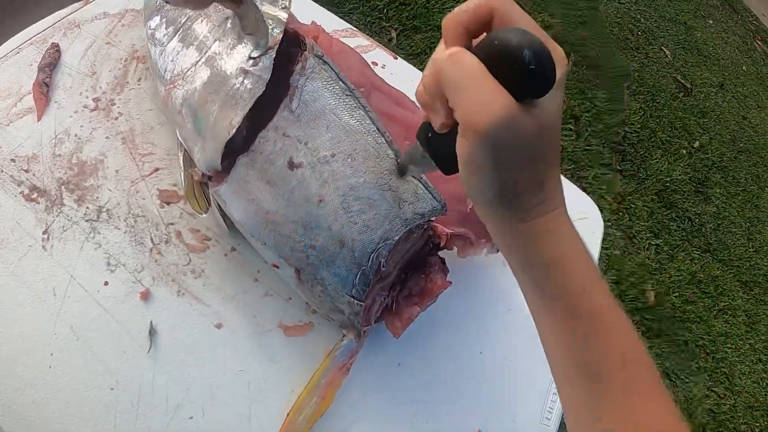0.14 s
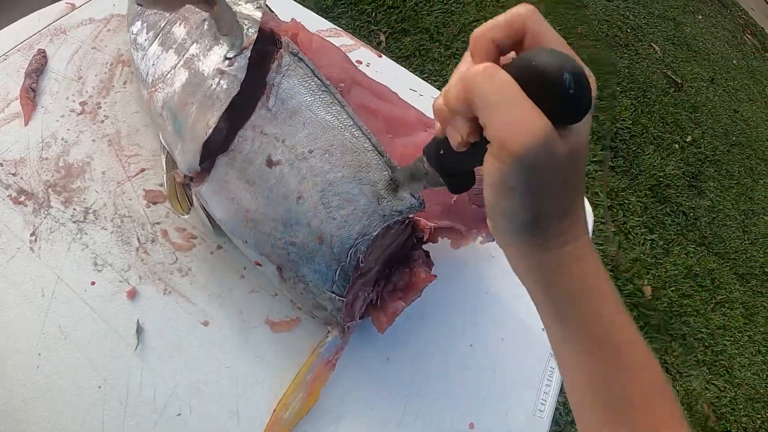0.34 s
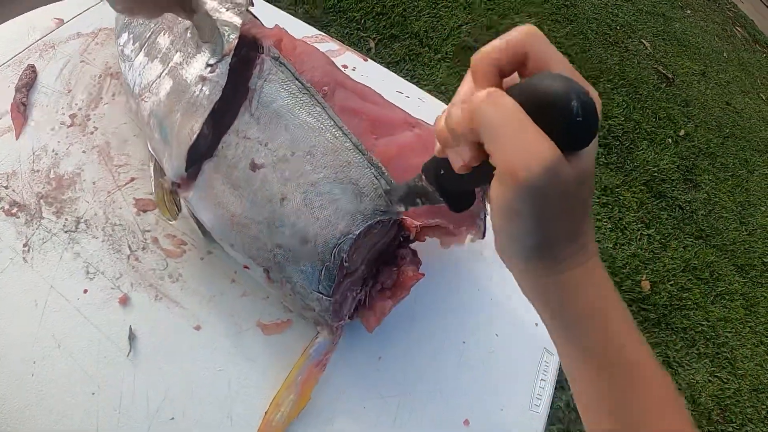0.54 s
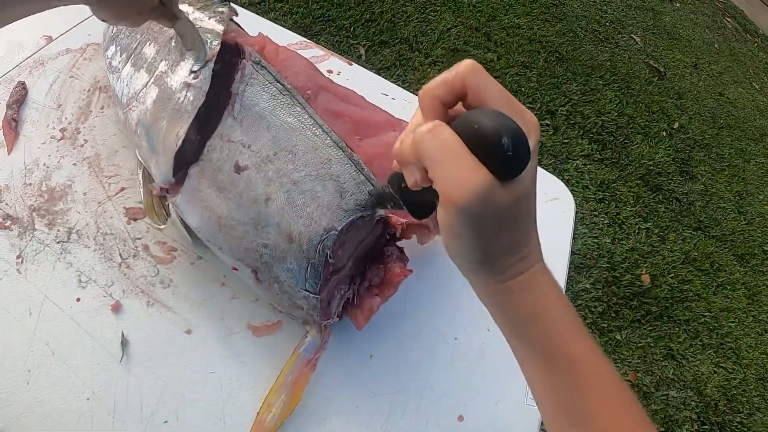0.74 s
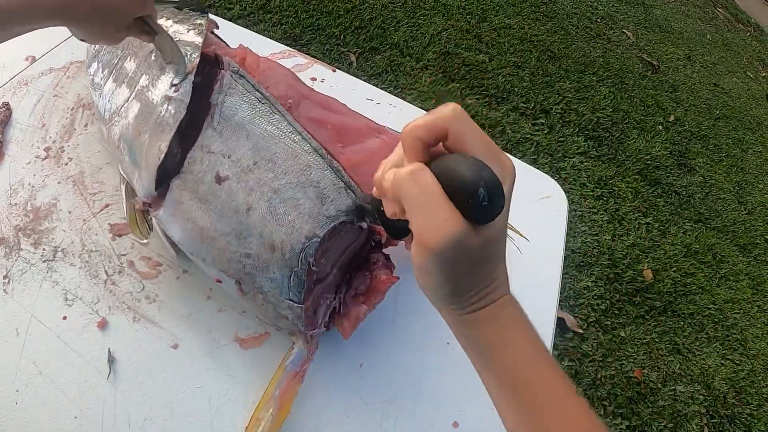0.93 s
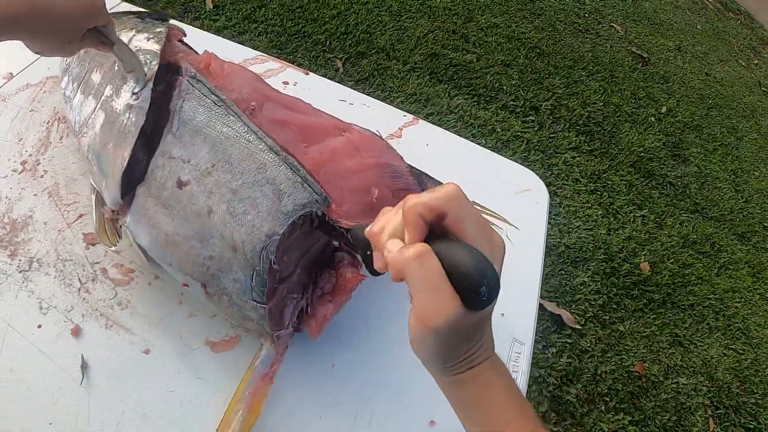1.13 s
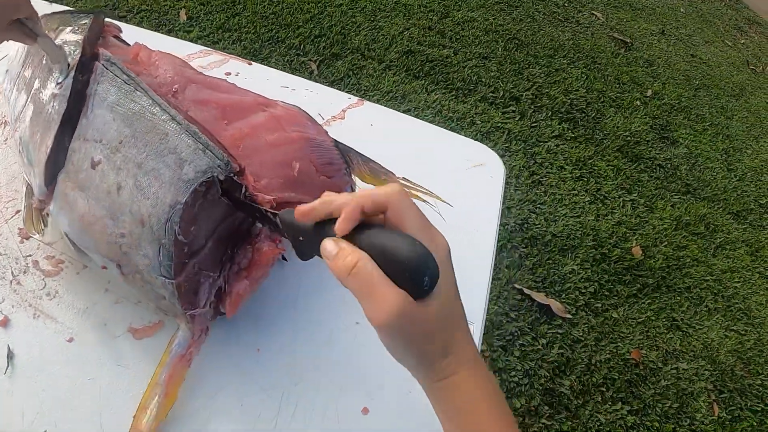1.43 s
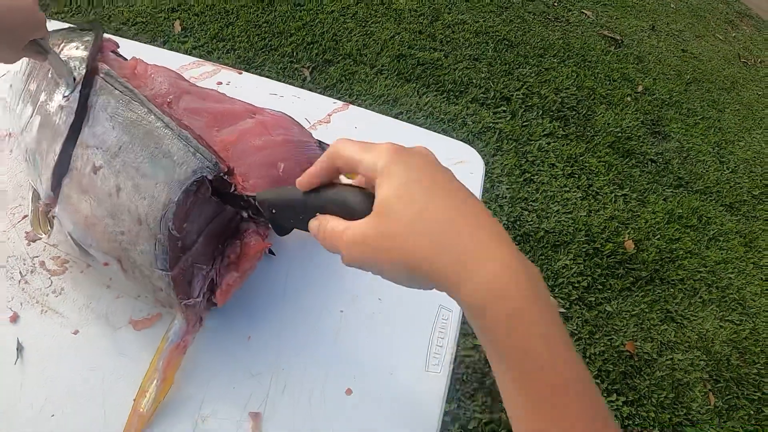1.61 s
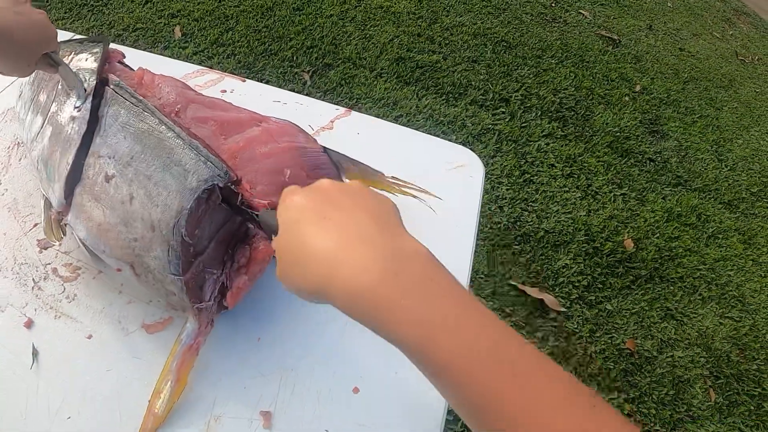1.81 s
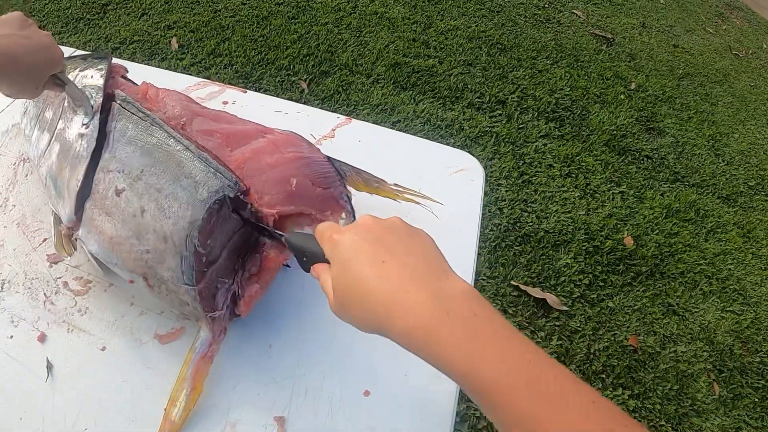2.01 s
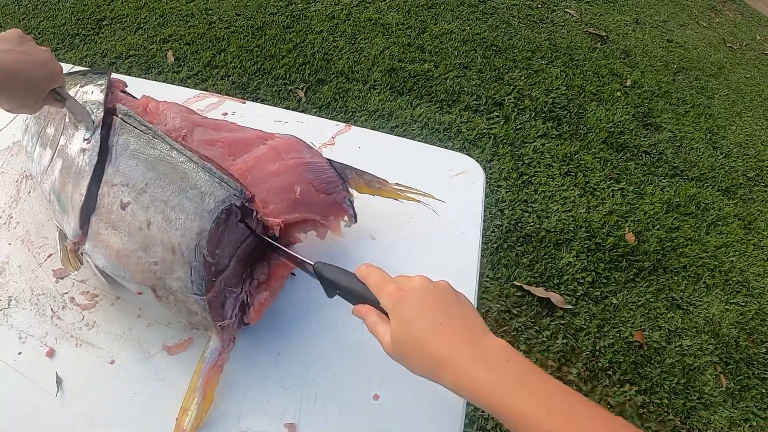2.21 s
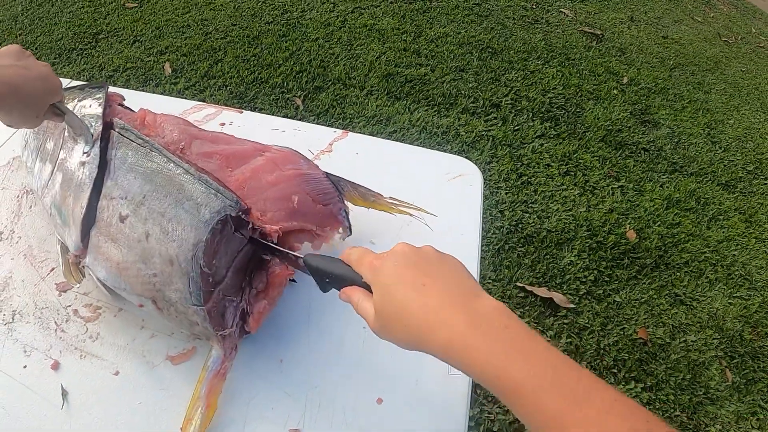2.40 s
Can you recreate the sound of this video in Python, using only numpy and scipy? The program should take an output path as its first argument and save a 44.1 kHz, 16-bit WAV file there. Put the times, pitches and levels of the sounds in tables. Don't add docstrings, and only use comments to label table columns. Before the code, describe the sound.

Fish being cut with a knife: dry rasps, sharp bone snaps and dull table thumps outdoors

```python
import sys
import numpy as np
from scipy import signal
from scipy.fft import rfft, irfft, next_fast_len
from scipy.io import wavfile
from scipy.ndimage import uniform_filter1d, map_coordinates

SR = 44100
rng = np.random.default_rng(int(sys.argv[2]) if len(sys.argv) > 2 else 0)


def int16_out(signal):
    q = np.round(np.clip(np.atleast_2d(signal).T, -1, 1) * 32767)
    wavfile.write(sys.argv[1], SR, q.astype(np.int16))


def makeup_ratio(level_db):
    decades = np.asarray(level_db, float) / 20
    return 10 ** decades


N = 112454


def unit(x):
    return x / np.sqrt(np.mean(x ** 2) + 1e-20)


def along(points, hz):
    point_hz, value = np.transpose(points)
    return np.interp(np.log(hz + 1), np.log(point_hz + 1), value)


def wobble(rate_hz):
    knots = rng.standard_normal(int(N * rate_hz / SR) + 4)
    return map_coordinates(knots, [np.arange(N) * rate_hz / SR])


def filtered(x, response):
    n = x.shape[-1]
    padded = next_fast_len(n + 4096)
    hz = np.fft.rfftfreq(padded, 1 / SR)
    return irfft(rfft(x, padded) * response(hz), padded)[..., :n]


def body(modes):
    def response(f):
        total = 0
        for k, (centre, width, db) in enumerate(modes):
            resonance = 1j * f * width / (centre * centre - f * f + 1j * f * width)
            total = total + (-1) ** k * makeup_ratio(db) * resonance
        return total
    return response


def add(track, start_s, sound):
    part = track[..., round(start_s * SR):][..., :sound.shape[-1]]
    part += sound[..., :part.shape[-1]]


def push(start_s, length_s, db, rise, release_s):
    t = np.arange(N) / SR - start_s
    build_up = np.clip(t / (length_s * np.clip(rise, .02, 1)), 0, 1) ** 1.2
    return makeup_ratio(db) * build_up * np.exp(-np.maximum(t - length_s, 0) / release_s)


def knock(db, hz, t60):
    t = np.arange(SR // 10) / SR
    attack = 1 - np.exp(-t / 0.00098)
    return makeup_ratio(db - 60 * t / t60) * attack * np.sin(2 * np.pi * hz * t)


# frequency_hz, correlation
LIKENESS = [(60, 1), (240, 0.89), (950, 0.47), (3770, 0.83), (15000, 0.06)]


def rush(spectrum, spiky_db):
    pair = rng.standard_normal((2, N)) * makeup_ratio(spiky_db * rng.exponential(size=N))

    def response(hz):
        turn = np.arccos(np.clip(along(LIKENESS, hz), -1, 1)) / 2
        return makeup_ratio(along(spectrum, hz)) * np.array([np.cos(turn), np.sin(turn)])

    mid, side = filtered(pair, response)
    return unit(np.array([mid + side, mid - side]))


# frequency_hz, level_db
RUMBLE_SPECTRUM = [(12, -46.5), (20, -21.5), (81, -2), (123, -2.5), (215, -15.5), (320, -18.5), (393, -28),
                   (900, -37.5), (1170, -31), (1980, -120)]
# frequency_hz, level_db
GARDEN_SPECTRUM = [(180, -32), (300, -16), (600, -20.5), (2500, -25.5), (8000, -35.5), (14000, -53)]
WIND_DB, GARDEN_DB = -52.5, -68.5
RATTLE_DB = -6


def air(booms):
    shake = uniform_filter1d(np.abs(booms), size=900)
    rumble_gain = makeup_ratio(WIND_DB + 1.4 * wobble(18)) + makeup_ratio(RATTLE_DB) * shake
    rumble = rumble_gain * rush(RUMBLE_SPECTRUM, spiky_db=0.0)
    deeper = [(hz / 2.4, db) for hz, db in RUMBLE_SPECTRUM]
    legs = makeup_ratio(RATTLE_DB - 3) * shake * rush(deeper, spiky_db=2)
    garden = makeup_ratio(GARDEN_DB + 0.26 * wobble(28)) * rush(GARDEN_SPECTRUM, spiky_db=-1.5)
    return rumble + legs + garden


# start_s, length_s, pitch_hz, level_db
BIRD_CHIRPS = [
    (0.82, .03, 7000, -69),
    (2.53, .025, 7500, -67.5),
]


def bird():
    t = np.arange(N) / SR
    out = np.zeros(N)
    for start_s, length_s, hz, db in BIRD_CHIRPS:
        since = t - start_s
        tone = np.sin(2 * np.pi * hz * since * (1 - 0.33 * since))
        out += push(start_s, length_s, db, .3, .004) * tone * makeup_ratio(3 * wobble(180))
    return out


# start_s, peak_db, boom_hz, free_ring_s, scuff_db
TABLE_SHOVES = [(0.091, -38.5, 136, 0.17, -13), (0.184, -42, 77.5, 0.072, -27),
                (0.4045, -32.5, 121, 0.028, -4.5), (0.441, -34, 80.6, 0.043, -7.5),
                (0.534, -38.5, 117.3, 0.043, -8), (0.656, -33.5, 124.6, 0.065, -3),
                (0.788, -33.5, 114.3, 0.055, -7), (0.908, -32, 104, 0.027, -1),
                (0.954, -35.5, 135, 0.017, -25), (0.981, -33.5, 99.5, 0.018, -5.5),
                (1.041, -32, 107.4, 0.049, -8), (1.071, -35, 128, 0.057, -8),
                (1.135, -29.5, 80.4, 0.06, -2), (1.313, -44.5, 102, 0.032, -9),
                (1.383, -45.5, 124, 0.04, -3), (1.532, -45, 114, 0.029, -2.5),
                (1.641, -41, 113.5, 0.034, -4), (1.85, -49, 115, 0.079, 2), (1.959, -34.5, 74, 0.027, -28),
                (1.986, -32, 119.3, 0.048, -26), (2.084, -39, 131.3, 0.076, 0.5),
                (2.25, -28, 147.6, 0.024, -9.5), (2.277, -29.5, 80, 0.018, -37),
                (2.356, -38.5, 121.5, 0.057, -4.5), (2.509, -45.5, 116.5, 0.064, -4)]
# start_s, peak_db, pitch_hz, t60_s
TABLE_BUMPS = [
    (.1595, -38, 1050, .012),
    (.79, -46, 480, .03),
    (.91, -30, 250, .035),
    (.9185, -35, 290, .05),
    (.9695, -35, 740, .014),
    (.9735, -36, 520, .05),
]
# frequency_hz, width_hz, level_db
PANEL_MODES = [(161.5, 33, 0), (228.7, 27.5, 2.5), (314, 16.7, -2), (370, 20, -6.5), (531, 43, -6.5),
               (800, 170, -18)]
SAG, SAG_S, SHOVE_ATTACK_S = 0.85, 0.0031, 0.0027
SCUFF_T60, BOOM_T60, DAMP_T60 = 0.095, 0.49, 0.13


def table():
    out, t = np.zeros(N), np.arange(SR // 2) / SR
    for start_s, db, hz, free_s, scuff_db in TABLE_SHOVES:
        turns = hz * (t + SAG * SAG_S * (1 - np.exp(-t / SAG_S)))
        rise = 1 - np.exp(-t / SHOVE_ATTACK_S)
        decay = makeup_ratio(-60 * t / BOOM_T60 - 60 * np.maximum(t - free_s, 0) / DAMP_T60)
        boom = np.sin(2 * np.pi * turns) * rise * decay
        rub = rng.standard_normal(len(t)) * rise * makeup_ratio(-60 * t / SCUFF_T60)
        scuff = filtered(rub, body(PANEL_MODES))
        boom = boom / np.abs(boom).max()
        scuff = makeup_ratio(scuff_db) * scuff / np.abs(scuff).max()
        add(out, start_s, makeup_ratio(db) * (boom + scuff))
    for start_s, db, hz, t60 in TABLE_BUMPS:
        add(out, start_s, knock(db, hz, t60))
    return out


# centre_s, peak_db, pitch_hz, half_length_s
TABLE_JOLT = (.1765, -20.5, 88, .0048)


def jolt():
    centre_s, db, hz, half_s = TABLE_JOLT
    t = np.arange(N) / SR - centre_s
    return -makeup_ratio(db) * np.sin(2 * np.pi * hz * t) * np.exp(-.5 * (t / half_s) ** 2)


# start_s, length_s, level_db, build_up_share
SKIN_STROKES = [(0, 0.048, -52.5, 0), (0.067, 0.067, -57, 0.56), (0.123, 0.037, -46.5, 0.35),
                (0.256, 0.081, -54, 0.25), (0.366, 0.078, -43.5, 1), (0.504, 0.11, -55.5, 0.5),
                (0.638, 0.055, -50, 0.5), (0.917, 0.032, -61.5, 0.5), (0.98, 0.021, -59, 0.85),
                (1.1, 0.028, -61, 0.7), (1.163, 0.026, -71, 0.3), (1.235, 0.18, -68, 0.03),
                (1.504, 0.058, -63, 0.24), (1.892, 0.065, -60.5, 0.08), (2.228, 0.066, -54.5, 0.3)]
# start_s, length_s, level_db, slit_hz
FLESH_SLIDES = [(0, 0.35, -64, 3520), (0.401, 0.17, -50.5, 2590), (0.615, 0.14, -53.5, 2500),
                (0.8, 0.21, -63, 1900), (1.039, 0.14, -58.5, 2580), (1.234, 0.3, -67.5, 2400),
                (1.491, 0.2, -67.5, 2410), (1.922, 0.076, -57.5, 2290), (2.204, .12, -58.5, 2700),
                (2.403, 0.18, -62, 2400)]
# frequency_hz, density_db (per Hz)
SKIN_SPECTRUM = [(710, -11), (1200, -7), (2400, -8), (3880, -3.5), (6000, -10.5), (8800, -6.5),
                 (12400, -18.5), (15400, -17), (16500, -37)]
# frequency_hz, density_db (per Hz)
FLESH_SPECTRUM = [(240, -35.5), (400, -0.5), (753, -2), (1880, -5), (2520, -9), (4240, -8), (5940, -9),
                  (11500, -30.5), (15000, -71.5), (22000, -120)]


def blade():
    strokes = sum(push(*row, release_s=0.01) for row in SKIN_STROKES)
    rasp = strokes * makeup_ratio(2.6 * wobble(150)) * rush(SKIN_SPECTRUM, spiky_db=1) * makeup_ratio([[.8], [-.8]])
    flutter = makeup_ratio(1.2 * wobble(24.96) + 0.86 * wobble(120))
    flesh = rush(FLESH_SPECTRUM, spiky_db=2.5) * flutter * makeup_ratio([[-1.5], [1.5]])
    slides = np.zeros((2, N))
    for start_s, length_s, db, slit_hz in FLESH_SLIDES:
        slit = body([(slit_hz, 300, 9)])
        sung = unit(filtered(flesh, lambda f: 1 + slit(f)))
        slides += push(start_s, length_s, db + 2.0, 0.23, release_s=0.035) * sung
    return rasp + slides


def even(x, burst):
    y = x
    for _ in range(12):
        spectrum = rfft(y)
        y = irfft(spectrum / (np.abs(spectrum) + 1e-9), len(x)) * burst
    return y * np.linalg.norm(x) / np.linalg.norm(y)


STRAIN_S = .008


def crack(db, colour, hold_s, t60, apart, blow):
    t = np.arange(SR // 20) / SR - STRAIN_S
    splinters = makeup_ratio(-60 * np.maximum(t - hold_s, 0) / t60)
    tail = makeup_ratio(-30.5 - 60 * t / 0.06)
    shape = np.where(t < 0, makeup_ratio(-38 + 3100 * t), splinters + tail)
    common, differing = rng.standard_normal((2, len(t))) * shape
    common[round(STRAIN_S * SR)] = blow
    burst = (t >= 0) & (t < hold_s + t60 / 8)
    common = np.where(burst, even(common * burst, burst), common)
    pair = np.array([common + apart * differing, common - apart * differing])
    pair = filtered(pair, lambda f: colour(f) * 1j * f / (1500 + 1j * f))
    return pair / np.abs(pair.mean(0)).max() * makeup_ratio(db)


# start_s, peak_db, knock_hz, knock_db, splintering_s
RIB_BREAKS = [
    (1.0718, -7, 590, -9.5, 0.0011),
    (1.1357, -9, 737, -8, 0.00072),
    (1.3504, -21, 594, -20.5, 0.0016),
    (1.91, -12.5, 652, -14, 0.00048),
    (1.9571, -23, 683, -8, .0015),
    (2.2339, -22.5, 700, -11.5, 0.0012),
    (2.2529, -10.5, 740, -5, 0.0023),
    (2.2622, -12.5, 700, -12, 0.0011),
    (2.2784, -10.5, 650, -6.5, 0.00049),
]
# frequency_hz, level_db
RIB_RINGS = [
    [(2010, -1), (3480, -2), (5230, -14), (6840, -11), (9020, -12)],
    [(2120, -7), (3420, -0.5), (4640, -3.5), (6300, -11.5), (9230, -13.5)],
    [(2280, 0), (3110, 4), (4600, 1.5), (5280, 1), (8840, -2.5)],
    [(2270, -0.5), (3610, 4.5), (5700, -1.5), (7390, -4.5), (8310, -9)],
    [(2550, 9), (4200, -8), (6090, -30)],
    [(2200, -1), (3560, 3), (6000, -8)],
    [(1760, 2), (2800, 6.5), (3560, -1.5), (6600, -6.5), (8600, -13)],
    [(2750, 6), (4500, -6), (6400, -7), (8600, -9)],
    [(2880, 1), (5720, -2), (7310, -9), (8700, -5)],
]
# start_s, peak_db, strongest_ring_hz, knock_db, brightness_db
BONE_SNAPS = [
    (0.1584, -36.5, 1980, 4.5, -14),
    (0.4234, -41.5, 3530, 1, 16),
    (0.4375, -27, 4220, -1, 11),
    (0.4421, -32.5, 4470, 6.5, 22),
    (0.6769, -23.5, 1600, -3.5, 4),
    (1.1063, -34.5, 1790, -12, -12),
    (1.2519, -32.5, 2240, -29, 15),
    (2.0105, -39, 2230, -10, -26),
    (2.2728, -24, 2670, -8, 13),
]
# start_s, peak_db, pitch_hz
EDGE_TICKS = [(0.032, -35, 5000), (0.046, -35.5, 7100), (.0614, -38, 6000), (0.0942, -53, 3720),
              (0.1152, -47, 7000), (.1326, -52, 4400), (0.1524, -32, 8550), (.232, -55, 11000),
              (0.2667, -35, 7500), (0.2904, -28, 8800), (0.378, -44, 7000), (.393, -48, 4230),
              (0.397, -46, 8500), (0.4492, -40, 4500), (.5666, -36, 6100), (0.575, -33.5, 7600),
              (0.633, -34.5, 5700), (0.717, -36, 4500), (1.001, -48, 5000), (1.0612, -41, 3000),
              (1.1, -42, 4600), (1.2449, -42.5, 4000), (1.2684, -42, 4500), (1.29, -41, 4930),
              (1.3095, -48.5, 6960), (1.3274, -38, 5000), (1.407, -55, 6000), (1.411, -59, 3020),
              (1.4607, -38.5, 3150), (1.9051, -33.5, 3650), (1.9228, -34.5, 4540), (1.9348, -45, 2400),
              (1.948, -43, 2300), (1.953, -34.5, 2750), (1.969, -43, 2600), (1.9747, -37, 2370),
              (1.985, -45.5, 2270), (2.0045, -50, 2200), (2.111, -54.5, 8500), (2.2433, -34, 3340),
              (2.247, -29, 3000), (2.25, -30, 3120), (2.2675, -31, 2470), (2.424, -53, 7300)]
# frequency_hz, width_hz, level_db
BONE_MODES = [(2117, 3740, -6.5), (3610, 1330, -0.5), (4600, 1660, -7.5), (7250, 910, -9.5),
              (8620, 390, -9.5), (12200, 3900, -38)]
SPLINTER_S, SPLINTER_T60, TICK_T60 = 0.0029, 0.0067, 0.0082
RING_WIDTH_HZ, KNOCK_LAG_S, KNOCK_T60 = 520, .001, .013


def ribs(out):
    for (start_s, db, knock_hz, knock_db, hold_s), rings in zip(RIB_BREAKS, RIB_RINGS):
        modes = [(hz, RING_WIDTH_HZ, ring_db) for hz, ring_db in rings] + [(10680, 1600, -27)]
        colour = lambda f: sum(body([mode])(f) for mode in modes)
        add(out, start_s - STRAIN_S, crack(db, colour, hold_s, SPLINTER_T60, apart=0.27, blow=6))
        add(out, start_s + KNOCK_LAG_S, knock(db + knock_db, knock_hz, KNOCK_T60))


def snaps(out):
    for start_s, db, hz, knock_db, bright_db in BONE_SNAPS:
        strongest = body([(hz, hz / 5, 3.5)])
        shelf = lambda f: (4500 + 1j * f * makeup_ratio(bright_db)) / (4500 + 1j * f)
        colour = lambda f: body(BONE_MODES)(f) * (1 + strongest(f)) * shelf(f)
        add(out, start_s - STRAIN_S, crack(db, colour, SPLINTER_S, SPLINTER_T60, apart=0.75, blow=4.9))
        add(out, start_s, knock(db + knock_db, np.clip(hz / 3.9, 520, 760), KNOCK_T60))


def ticks(out):
    for start_s, db, hz in EDGE_TICKS:
        colour = body([(hz, .28 * hz, 0), (1.92 * hz, 4000, -12)])
        add(out, start_s - STRAIN_S, crack(db, colour, 0.00093, TICK_T60, apart=.3, blow=6.2))


def bones():
    out = np.zeros((2, N))
    ribs(out)
    snaps(out)
    ticks(out)
    left_excess = [(500, -3.5), (1200, 9.5), (2500, -1.8), (8000, 3.0)]  # (Hz, dB)
    return filtered(out, lambda hz: makeup_ratio(np.array([[.5], [-.5]]) * along(left_excess, hz)))


def scene():
    booms = table() + jolt()
    return air(booms) + bird() + booms * makeup_ratio([[-.35], [.35]]) + blade() + bones()


def roll_off(x):
    return signal.sosfilt(signal.butter(12, 16830, fs=SR, output="sos"), x)


# frequency_hz, lead_rad
PORT_LEAD = [(100, 0.025), (1000, 0.1), (4000, 1.09), (8000, 1.57), (14000, 4.1)]
TOP_HZ = 14300


def record(dry):
    def port(hz):
        lead = np.exp(.5j * along(PORT_LEAD, hz) * np.array([[1], [-1]]))
        return lead / (1 + (hz / TOP_HZ) ** 12)

    return roll_off(filtered(dry, port))


dry = scene()
out = record(dry)
int16_out(out)
```